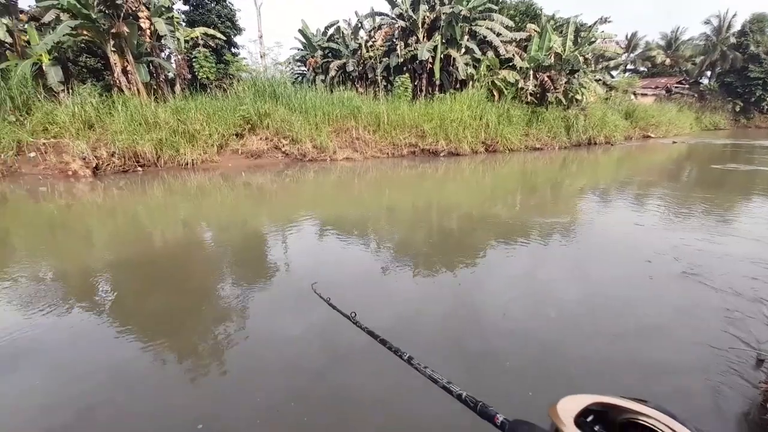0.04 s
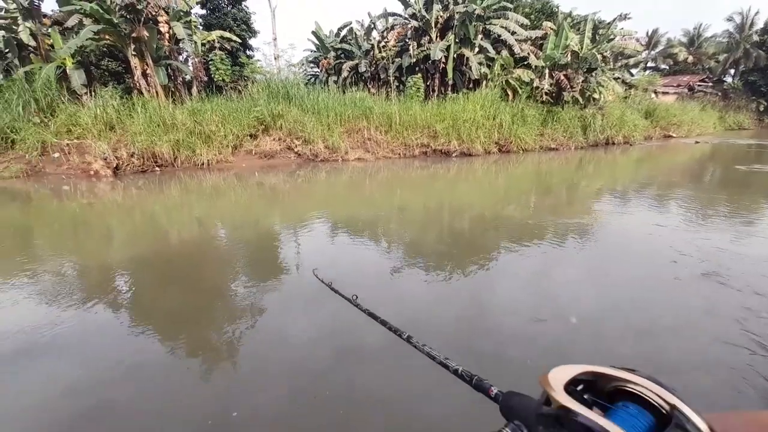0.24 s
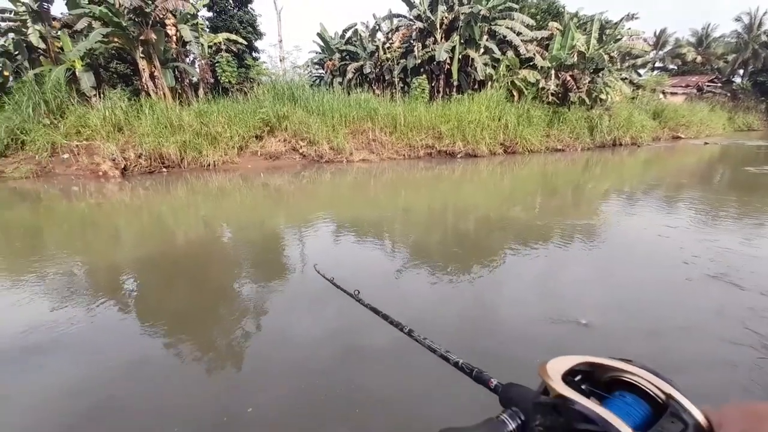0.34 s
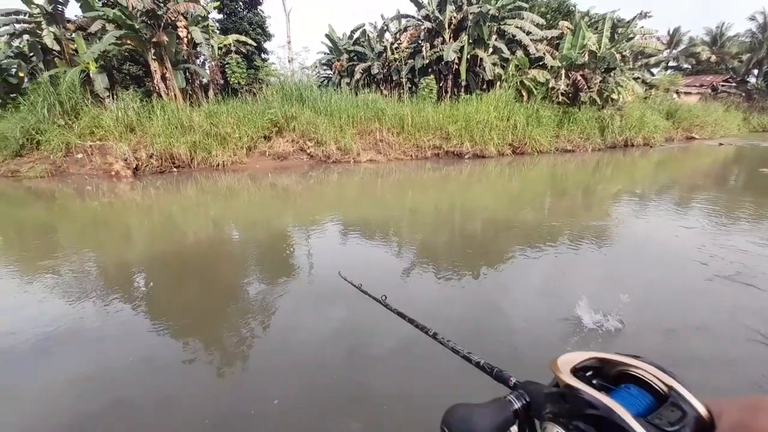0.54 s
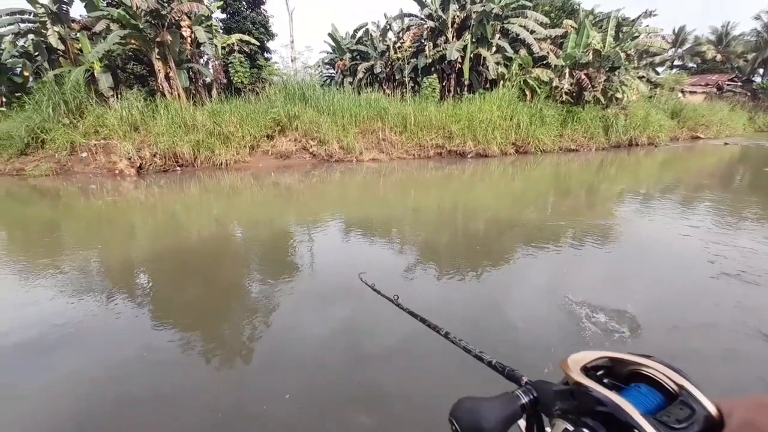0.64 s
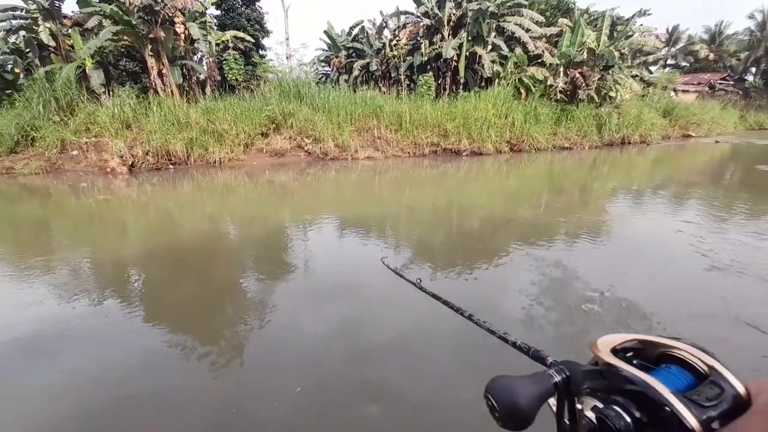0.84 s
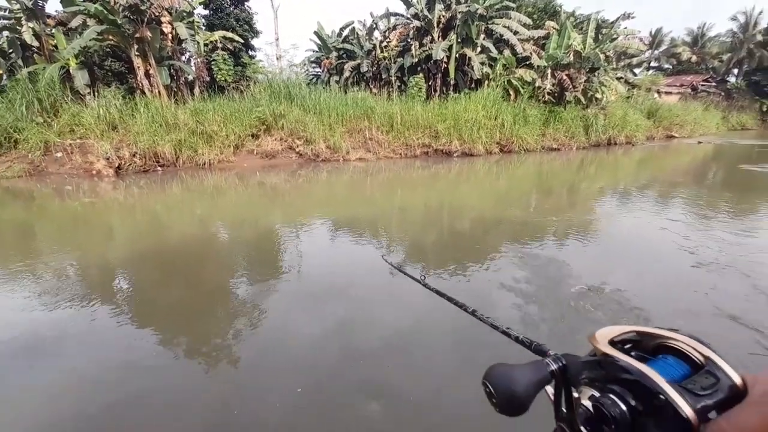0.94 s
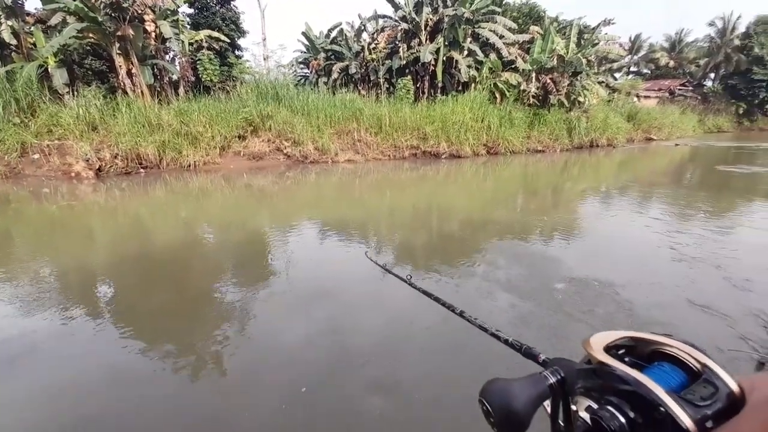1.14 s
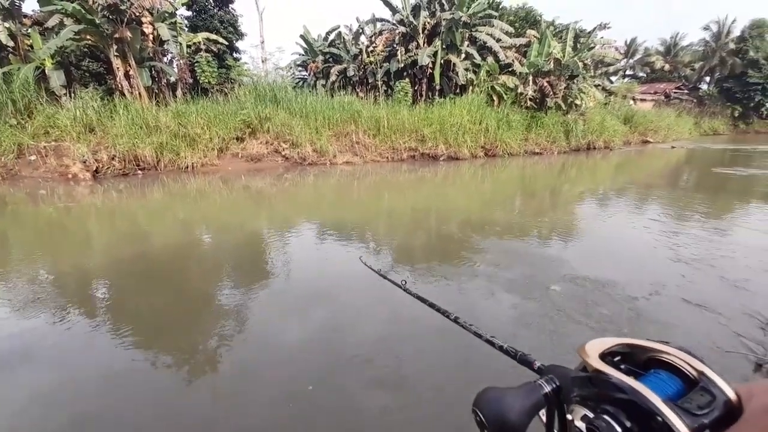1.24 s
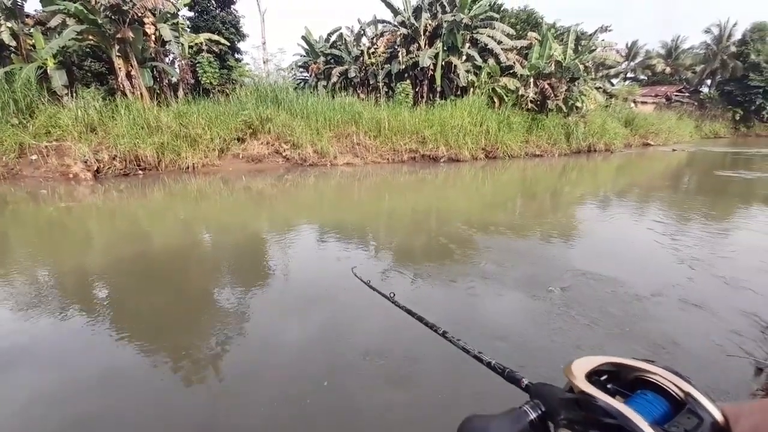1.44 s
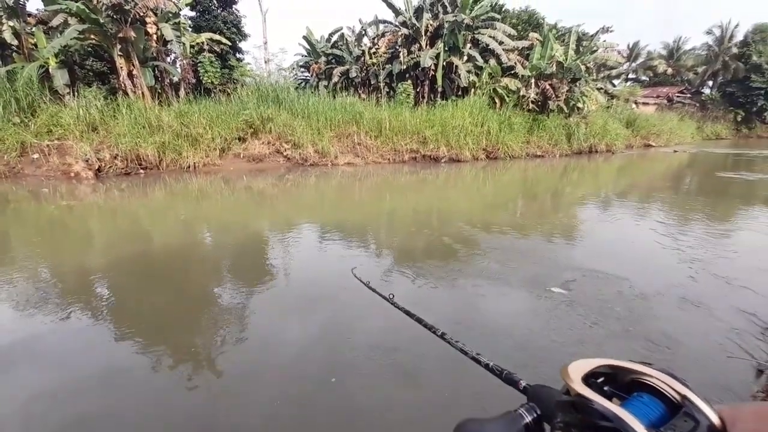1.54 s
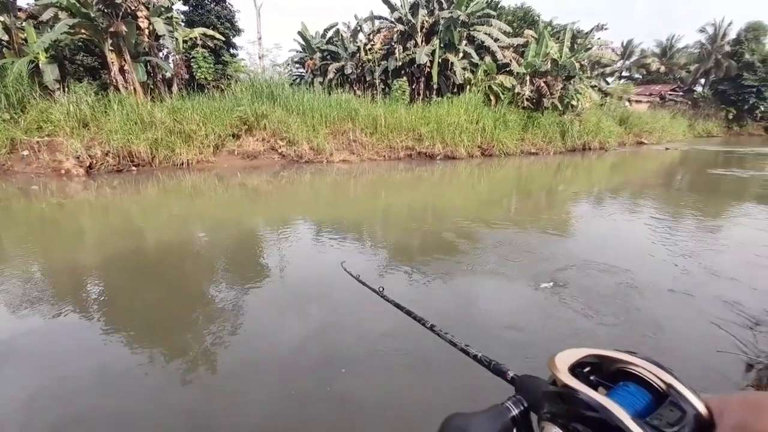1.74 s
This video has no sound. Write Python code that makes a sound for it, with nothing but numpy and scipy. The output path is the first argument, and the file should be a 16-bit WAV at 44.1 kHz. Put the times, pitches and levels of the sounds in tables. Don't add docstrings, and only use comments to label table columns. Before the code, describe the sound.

Sudden fish splash in calm river water, with bubbly gulps and fine droplets thinning to quiet

```python
import sys
import numpy as np
from scipy import signal
from scipy.fft import rfft, irfft, next_fast_len
from scipy.io import wavfile
from scipy.ndimage import uniform_filter1d

SR = 44100
rng = np.random.default_rng(int(sys.argv[2]) if len(sys.argv) > 2 else 0)


def amplitude_ratio(level_db):
    exponent = np.asarray(level_db, float) / 20
    return 10 ** exponent


def dump(signal):
    limited = np.clip(np.atleast_2d(signal).T, -1, 1)
    pcm = np.round(limited * 32767).astype(np.int16)
    wavfile.write(sys.argv[1], SR, pcm)


N = 79380
LAG_S = .00031


def evened(x):
    return x / np.sqrt(np.mean(x ** 2) + 1e-20)


def read(points, hz):
    f, value = np.transpose(points)
    return np.interp(np.log(hz + 1), np.log(f + 1), value)


def follow(points):
    return np.interp(np.arange(N) / SR, *np.transpose(points))


def add(mix, s, sound):
    part = mix[max(round(s * SR), 0):][:len(sound)]
    part += sound[:len(part)]


def shaped(x, gain):
    size = next_fast_len(x.shape[-1] + 4096)
    return irfft(rfft(x, size) * gain(np.fft.rfftfreq(size, 1 / SR)), size)[..., :x.shape[-1]]


def hump(centre_hz, width_hz):
    return lambda hz: 1 / (1 + (2 * (hz - centre_hz) / width_hz) ** 2)


def delayed(x, lag_s):
    return shaped(x, lambda hz: np.exp(-2j * np.pi * hz * lag_s))


def left_right(points, hz):
    return np.outer([.5, -.5], read(points, hz))


def tail(x, t60):
    t = np.arange(SR // 2) / SR
    taps = rng.standard_normal((2, len(t))) * amplitude_ratio(-60 * t / t60) * np.minimum(t / .002, 1)
    return signal.fftconvolve(x[None], taps / np.linalg.norm(taps[0]), axes=1)[:, :N]


def blip(hz, cycles, climb):
    u = np.arange(round(4 * cycles / hz * SR) + 2) / SR * hz / cycles
    wave = np.sin(2 * np.pi * cycles * u * (1 + climb * u))
    return wave * np.minimum(u * 6, 1) * np.exp(-2 * u)


def fish():
    # t/s, level/dB, length/s, centre f/Hz
    slaps = [(0.441, -53, .012, 4900), (0.457, -52.5, .012, 4200), (0.477, -41, 0.014, 1910),
             (0.508, -43, .012, 4700), (.51, -56, .008, 12500), (0.545, -51, .008, 13500),
             (0.577, -40, .014, 11700), (0.575, -37, .014, 5340), (0.537, -56, .002, 1260),
             (0.634, -45, .006, 4260), (.700, -37, .006, 4000), (.700, -38, .005, 6740),
             (.701, -45, .004, 14000), (0.736, -46.5, 0.018, 6550), (0.877, -62, .02, 2300)]
    # t/s, peak level/dB, f/Hz
    drops = [(.44, -56, 4500), (0.448, -43, 4450), (.487, -45, 13000), (0.489, -41, 5640),
             (.499, -40, 14100), (.513, -39, 13000), (.521, -33, 3100), (.579, -27, 11500),
             (.579, -32, 5950), (.587, -35, 13500), (.661, -38, 3300), (.726, -31.5, 5960),
             (.734, -31, 11800), (.742, -31, 6550), (0.749, -45, 5960), (.78, -36, 14000),
             (.786, -43, 8400), (0.802, -39, 11000), (0.807, -45, 2570), (.816, -40, 3500),
             (.823, -39, 5000), (0.841, -37.5, 12000), (.863, -39, 13000), (.874, -36, 3470),
             (.909, -34, 12000), (1.034, -42, 4700), (1.18, -52, 6600), (1.207, -47, 6200),
             (1.218, -42, 6040), (1.249, -44, 6100), (1.42, -52, 6500), (1.685, -54, 4000),
             (1.731, -51, 5100), (.757, -35.5, 4900), (0.806, -28, 13400), (1.411, -45, 5120),
             (.895, -39, 11600), (0.932, -34, 5570), (0.966, -36.5, 8650), (.983, -38.5, 7100),
             (1.005, -46, 3530), (1.028, -31, 8100), (1.045, -38, 7140), (1.088, -41, 11700),
             (1.093, -39, 6300), (1.113, -37, 14900), (1.161, -35.5, 9800), (1.16, -40, 5030),
             (1.218, -42, 3390), (1.246, -42, 13200), (1.286, -44, 9600), (1.318, -49, 13100),
             (1.427, -47.5, 9900)]
    # peak t/s, f/Hz, level/dB, ring/s, climb/(% per ms)
    gulps = [(0.512, 345, -44.5, 0.014, 0), (0.542, 302, -36, 0.0082, -0.5), (.588, 542, -33, 0.005, -2),
             (0.606, 544, -41, 0.016, -3.2), (.626, 483, -39, 0.01326, 4), (.65, 703, -35.5, 0.011, -1.4),
             (.67, 676, -38.5, 0.014, -0.5), (.68, 513, -35.5, 0.0079, 1.4), (.692, 590, -30, 0.021, 0.4),
             (0.707, 357.3, -36.5, 0.029, -0.5), (.708, 738, -26, 0.00569, -0.5),
             (.73, 703, -42.5, 0.015, 1), (0.827, 490, -45, 0.007, 0), (.842, 551.4, -44.5, .018, 1.0),
             (.948, 684, -48, 0.006, 0.5), (.958, 794, -56, 0.0066, 1)]
    # peak t/s, f/Hz, level/dB, ring/s, climb/(% per ms)
    bubbles = [(0.494, 1880, -34.5, 0.0022, 4), (0.51, 1320, -44, 0.0059, 1),
               (.523, 2460, -53, 0.0037, -2.5), (.576, 1490, -36, 0.0035, 0), (.588, 1480, -29, .003, -4.5),
               (0.603, 1970, -37, 0.0054, 0.7), (0.602, 1335, -39, 0.00384, 3),
               (0.626, 1357, -37, 0.0046, 4), (0.578, 1040, -36, .004, -1.3), (0.71, 996, -35, 0.0053, 2.6),
               (.708, 2170, -48.5, 0.0032, -7.5), (.713, 1330, -48, 0.006, -5),
               (0.729, 1044, -36, 0.0044, -0.8), (1.178, 714, -61, 0.024, 0),
               (.97, 1030, -47.5, 0.00674, 7), (1.161, 1420, -51.5, 0.0032, 5),
               (1.222, 1385, -57.5, 0.0093, 2.5), (1.339, 1130, -56, .005, 4),
               (.827, 2150, -50, 0.0026, -1), (.844, 1700, -50, .006, 2), (0.863, 1300, -61, 0.0066, 1),
               (0.878, 2700, -50, 0.0032, -1.5), (.885, 1870, -47.5, .005, 2),
               (.897, 2274, -49.5, .005, 1.5), (.958, 1320, -61, .003, .2), (.967, 2036, -51, .005, -.2),
               (.979, 1300, -62, 0.0053, 2), (1.169, 1680, -67, 0.0048, -1), (1.313, 1060, -61, 0.0066, 0),
               (.753, 1780, -46, 0.0033, 2)]
    # f/Hz, level/dB
    shadow = [(100, -1), (700, -1), (1300, 0), (2400, -1), (5000, -3), (8100, -3), (15000, -8)]
    wide_db, scatter_db, scatter_t60_s = 5.5, -10, .02

    water = spray()
    for s, *row in slaps:
        add(water, s, slap(*row))
    for s, *row in drops:
        add(water, s, drop(*row))
    for row in gulps + bubbles:
        add(water, *bubble(*row))
    wide = amplitude_ratio(wide_db) * np.array([spray(), spray()])
    wide = wide + amplitude_ratio(scatter_db) * tail(water, scatter_t60_s)
    fine = shaped(wide, lambda hz: hz ** 2 / (hz ** 2 + 2500 ** 2))
    both = np.array([delayed(water, LAG_S), water]) + fine
    return shaped(both, lambda hz: amplitude_ratio(left_right(shadow, hz)))


def slap(db, length, hz):
    u = np.arange(round(3 * length * SR)) / SR / length
    noise = rng.standard_normal((2, 4000))[:, :len(u)]
    ragged = noise[0] * amplitude_ratio(1.5 * evened(uniform_filter1d(noise[1], size=40)))
    burst = evened(shaped(ragged, hump(hz, .6 * hz)))
    rise = np.minimum(u / .25, 1)
    fall = np.exp(-np.maximum(u - .6, 0) ** 2 * 1.5)
    return amplitude_ratio(db) * burst * rise * fall


def bubble(peak, hz, db, ring, climb):
    rise, wobble = .6, .05
    t = np.arange(-2 * rise * ring, 3 * ring, 1 / SR)
    shake = evened(uniform_filter1d(rng.standard_normal(8000), size=150))[:len(t)]
    slide = np.clip(1 + 10 * climb * t / (1 + abs(t) / (2 * ring)), .5, 2)
    pitch = hz * slide * (1 + wobble * shake)
    shape = np.exp(-np.where(t < 0, (t / (rise * ring)) ** 2, abs(t / ring) ** 1.5))
    note = np.sin(2 * np.pi * (np.cumsum(pitch) / SR + rng.random()))
    return peak + t[0], np.sqrt(2) * amplitude_ratio(db) * shape * note


def drop(db, hz):
    ring = blip(hz, 10, 0.02)
    tick = rng.standard_normal(400)[:len(ring)] * np.exp(-np.arange(len(ring[:400])) / SR / 0.0014)
    ring[:400] += 0.35 * np.diff(tick, prepend=0)
    return amplitude_ratio(db) * ring


def spray():
    # t/s, level/dB
    churn = [
        (.43, -96),
        (.47, -58),
        (.52, -43),
        (.74, -44.5),
        (.9, -51.5),
        (.99, -51.5),
        (1.08, -62),
        (1.24, -56.5),
        (1.45, -77.5),
    ]
    # f/Hz, level/dB per Hz
    spray_tone = [(200, 17), (700, 6), (1700, 4.5), (3000, -5), (5000, -4), (7000, -8), (12000, -11.5),
                  (15500, -10)]
    fizz_per_s, fizz_spread_db, fizz_cycles, wash_db, flicker_db = 4500, 3.6, 6, -5, 2.5
    settle_s, settle_db_per_s = 0.92, -35

    size = amplitude_ratio(fizz_spread_db * np.minimum(rng.exponential(1, N), 3.8))
    size = size * (rng.random(N) < fizz_per_s / SR)
    pitches = np.geomspace(350, 14000, num=32)
    share = np.cumsum(pitches ** .7) / sum(pitches ** .7)
    kind = np.searchsorted(share, (rng.integers(0, 32, N) + rng.random(N)) / 32)
    fizz = np.zeros(N)
    for k, hz in enumerate(pitches):
        train = signal.oaconvolve(size * (kind == k), blip(hz, fizz_cycles, 0.09))[:N]
        fizz += evened(train) * np.sqrt(hz)
    flicker = amplitude_ratio(flicker_db * evened(shaped(rng.standard_normal(N), hump(0, 55))))
    both = (evened(fizz) + amplitude_ratio(wash_db) * rng.standard_normal(N)) * flicker
    both = evened(shaped(both, lambda hz: amplitude_ratio(read(spray_tone, hz))))
    settled = amplitude_ratio(settle_db_per_s * np.maximum(np.arange(N) / SR - settle_s, 0))
    return (both + (settled - 1) * shaped(both, hump(0, 5200))) * amplitude_ratio(follow(churn))


def birds():
    # start t/s, length/s, first f/Hz, last f/Hz, level/dB
    calls = [(.0, 0.02, 3170, 3150, -56), (0, 0.038, 2760, 2570, -53), (0.014, 0.022, 2236, 1900, -50),
             (0.079, 0.026, 3163, 3054, -49.5), (0.084, 0.042, 3008, 2860, -47),
             (0.141, 0.022, 2273, 2026, -42), (0.21, 0.015, 2346, 2830, -43),
             (0.216, .052, 2906, 2970, -48), (.278, 0.013, 2190, 2070, -44.5),
             (0.334, 0.011, 2360, 2810, -42), (0.34, 0.031, 2740, 2616, -45.5),
             (0.367, 0.019, 2564, 2504, -41.5), (0.411, 0.022, 2130, 2090, -47.5),
             (0.148, 0.11, 3480, 3470, -63.5), (0.233, 0.04, 3430, 3460, -65),
             (0.283, 0.066, 3480, 3420, -68), (0.365, 0.11, 3445, 3480, -78),
             (1.06, 0.085, 3170, 3294, -71), (1.185, 0.079, 3080, 3050, -67.5),
             (1.235, 0.037, 2950, 3100, -60), (1.277, 0.047, 3050, 3150, -65),
             (1.32, .055, 3150, 3230, -63), (1.373, 0.021, 3185, 3240, -65.5),
             (1.783, 0.017, 6130, 6280, -51)]
    warble, warble_hz, bank_t60_s, bank_db = .028, 190, .3, -9
    song = np.zeros(N)
    for s, length, first_hz, last_hz, db in calls:
        u = np.arange(0, length, 1 / SR) / length
        shake = evened(shaped(rng.standard_normal(SR // 4), hump(warble_hz, warble_hz)))[:len(u)]
        shake = shake * min(.045 / length, 1)
        depth = warble * min(first_hz / 2800, 3300 / first_hz) ** 3
        hz = (first_hz + (last_hz - first_hz) * u) * (1 + depth * shake)
        whistle = np.sin(np.pi * u) * np.sin(2 * np.pi * np.cumsum(hz) / SR)
        add(song, s, np.sqrt(2) * amplitude_ratio(db) * whistle)
    direct = np.array([delayed(song, 0.00021), song])
    return direct + amplitude_ratio(bank_db) * tail(song, bank_t60_s)


def distance():
    # f/Hz, level/dB per Hz
    rumble = [(28, -34), (52, -5.5), (110, -2), (200, -14.5), (450, -27), (900, -38), (4200, -43.5),
              (15800, -41)]
    # f/Hz, likeness/(0 to 1)
    same_points = [(60, 0.87), (240, 0.74), (950, 0.014), (3770, 0.043), (15000, 0.036)]
    # f/Hz, level/dB
    lean = [(60, -2.5), (950, 1), (15000, -1.5)]
    # t/s, level/dB
    drone = [
        (0, -57.5),
        (.3, -57),
        (.5, -73),
        (1.8, -97),
    ]
    # f/Hz, width/Hz, level/dB
    insects = [
        (7644, 700, -61.5),
        (11030, 930, -70),
    ]
    rumble_db, steady = -48, .6

    a, b, c, d = rng.standard_normal((4, 2, N))
    same = lambda hz: np.clip(read(same_points, hz), 0, .99)
    right = shaped(a[0], same) + shaped(a[1], lambda hz: np.sqrt(1 - same(hz) ** 2))
    pair = np.array([delayed(a[0], LAG_S), right])
    air = evened(shaped(pair, lambda hz: amplitude_ratio(read(rumble, hz) + left_right(lean, hz))))
    low = shaped(air, lambda hz: 1 / (1 + (hz / 300) ** 4))
    lumps = (uniform_filter1d((low ** 2).mean(0), size=5000) / np.mean(low ** 2)) ** (-steady / 2)
    drift = amplitude_ratio(1.64 * evened(shaped(b[1], hump(0, 1.1))))
    out = amplitude_ratio(rumble_db) * ((air - low) * drift + low * lumps)
    out = out + amplitude_ratio(follow(drone)) * evened(shaped(c + 0.51 * c[::-1], hump(384, 300)))
    buzz = d * amplitude_ratio(3.1 * evened(shaped(b, hump(0, 150))))
    for hz, width, db in insects:
        out = out + amplitude_ratio(db) * evened(shaped(buzz, hump(hz, width)))
    return out


def scene():
    return fish() + birds() + distance()


def low_pass(x):
    return signal.sosfilt(signal.butter(12, 15840, fs=SR, output="sos"), x)


def record(dry):
    finished = shaped(dry, lambda hz: np.clip((15850 - hz) / 100, 0, 1))
    return low_pass(finished)


dry = scene()
out = record(dry)
dump(out)
```